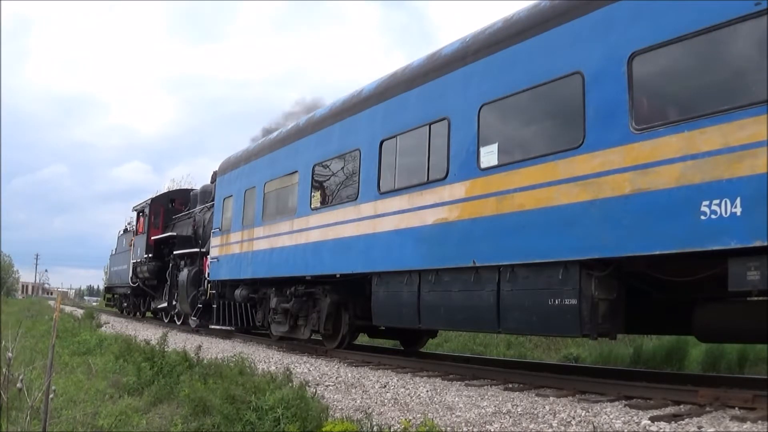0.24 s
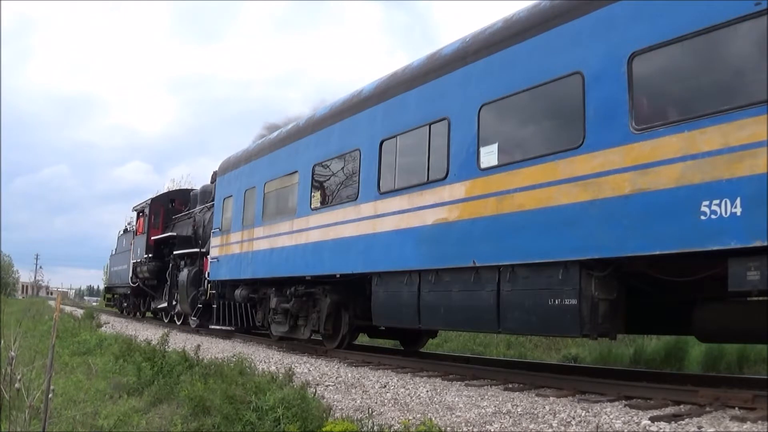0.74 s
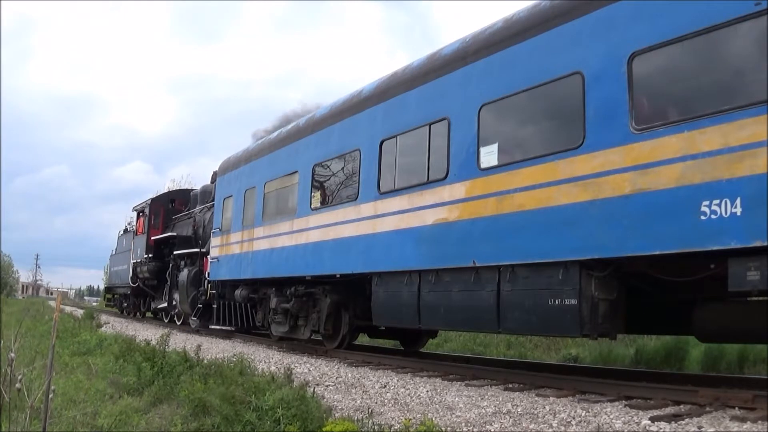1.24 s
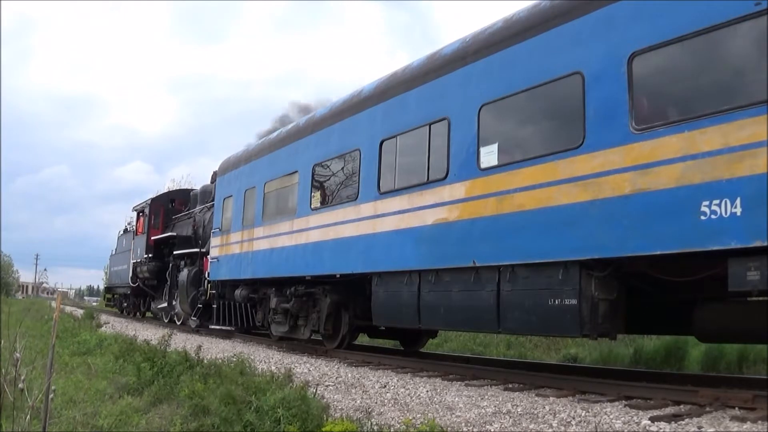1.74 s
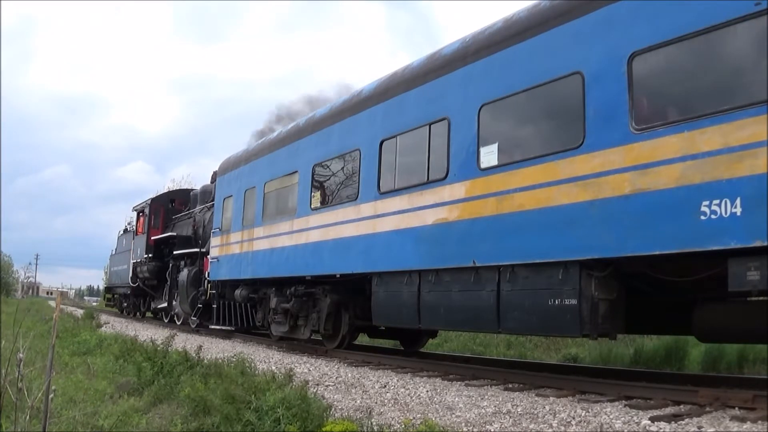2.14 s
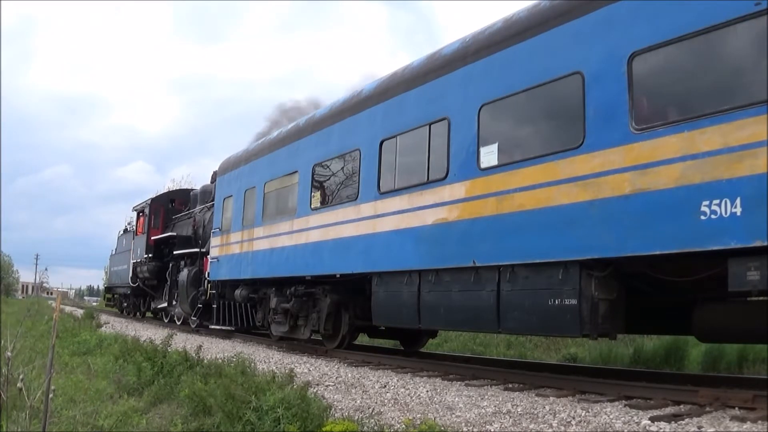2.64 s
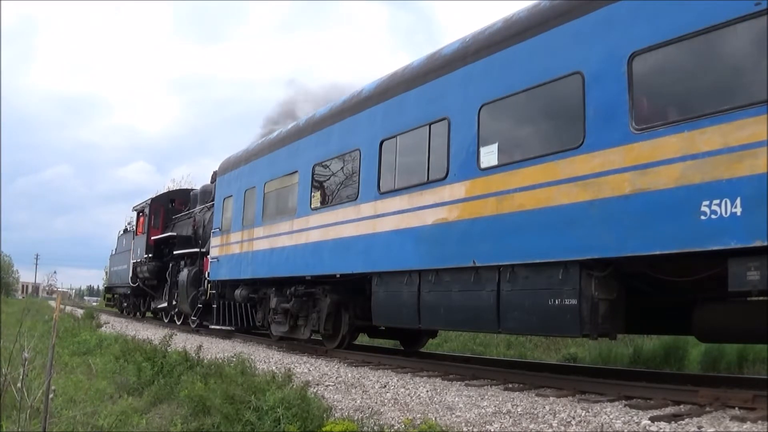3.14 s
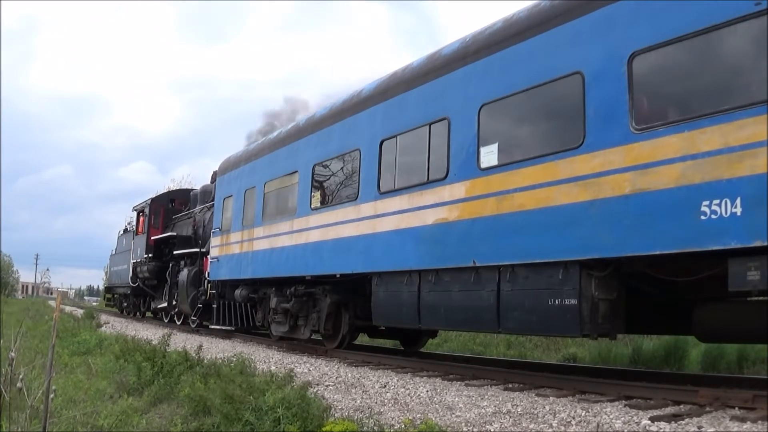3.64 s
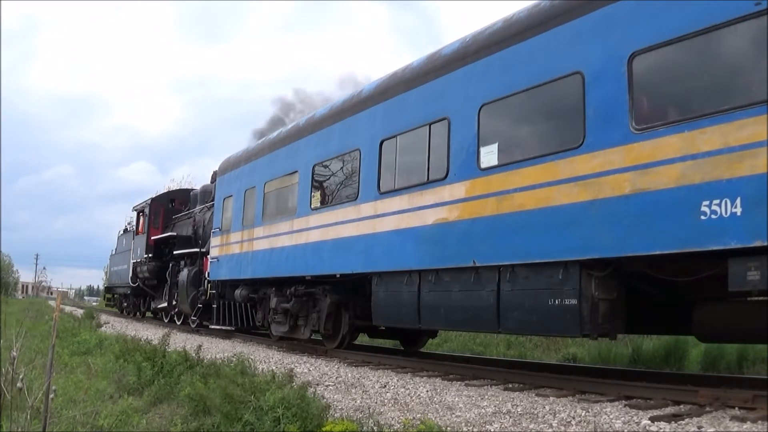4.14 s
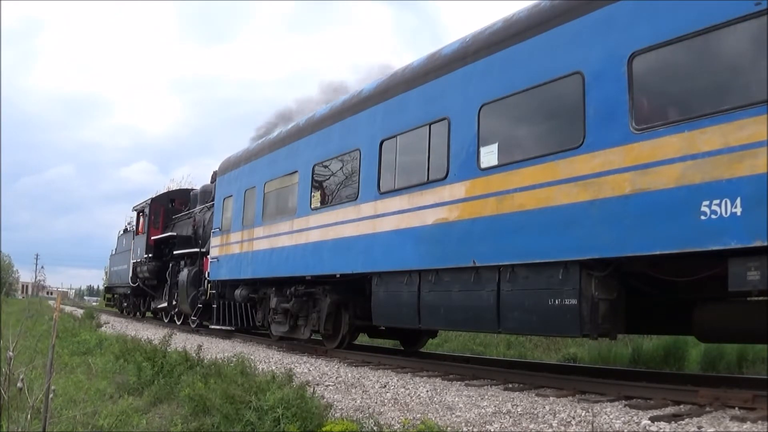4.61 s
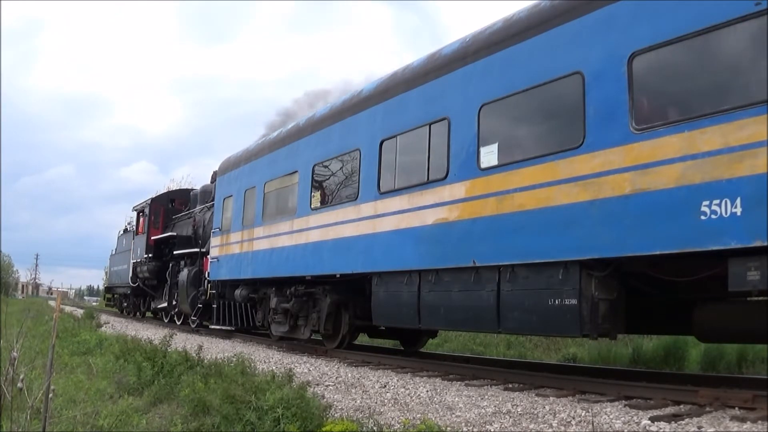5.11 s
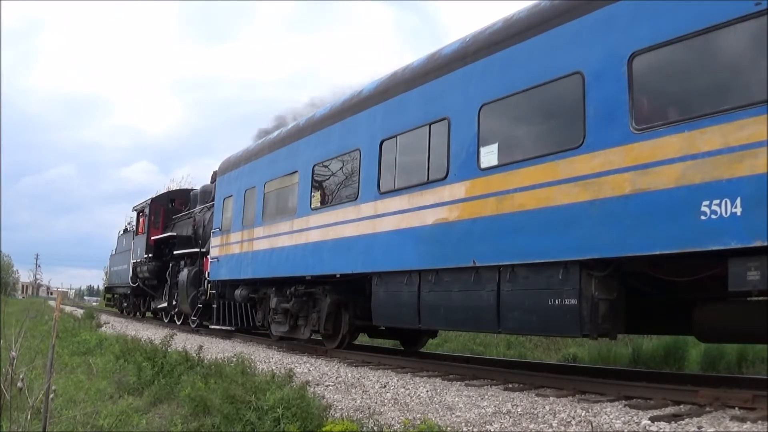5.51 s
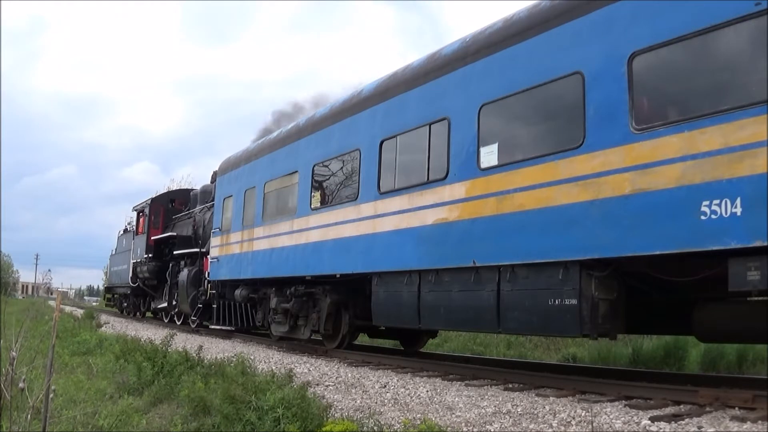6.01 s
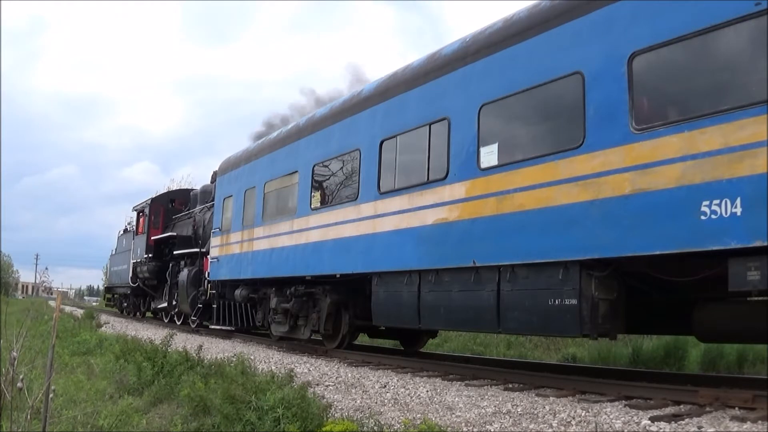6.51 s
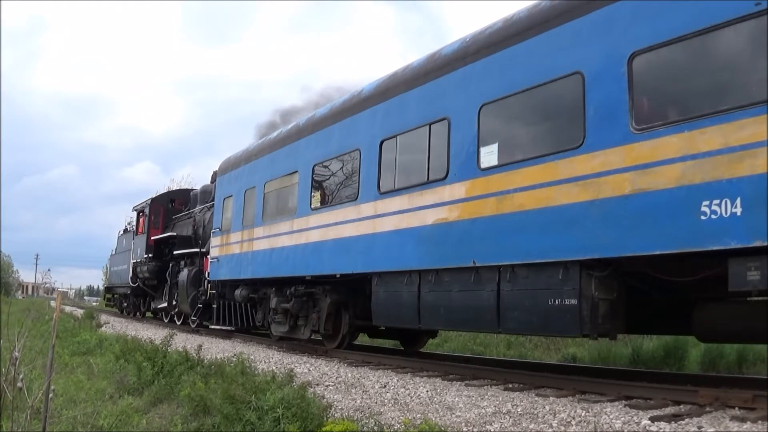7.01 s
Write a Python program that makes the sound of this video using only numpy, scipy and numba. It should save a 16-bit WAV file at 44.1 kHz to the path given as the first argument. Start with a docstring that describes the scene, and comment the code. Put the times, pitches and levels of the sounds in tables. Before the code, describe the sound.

Beside a railway carriage outdoors, a standing steam engine leaks a steady, slightly ringing hiss over a soft fluttering fire rumble. Wind thuds into the microphone. About a second in, a valve pops open with a dense roaring hiss, swelling for over two seconds, then squeals downward and snaps shut. The quiet remaining hiss gradually grows louder, with a thin, airy whistle joining later.

```python
"""Outdoors beside a railway carriage: a steam locomotive stands beyond it, and gusts buffet the microphones.
Leaking steam is coloured noise that rings in the pipework; the fire is a low, fluttering rumble.
A valve blows off for two and a half seconds, whistles as it closes and snaps shut; later a thin whistle joins.
The gain control ducks under the blast and then creeps back, so the steady hiss seems to build again."""
import sys
import numpy as np
from scipy import signal
from scipy.fft import rfft, irfft
from scipy.io import wavfile
from scipy.ndimage import uniform_filter1d
from numba import njit

SR = 44100
rng = np.random.default_rng(int(sys.argv[2]) if len(sys.argv) > 2 else 0)


def wav_out(sig):
    """Save sig, one row per channel (or a flat mono array), as 16-bit PCM at SR to the path in sys.argv[1]."""
    wavfile.write(sys.argv[1], SR, np.round(np.clip(np.atleast_2d(sig).T, -1, 1) * 32767).astype(np.int16))


N = 320166  # length [samples]

# How much steam and fire noise differs between the two ports: (frequency [Hz], side minus mid [dB])
STEAM_SIDE = [(80, -52), (500, -16), (1200, -9), (1800, -14.5), (2700, -12.5), (3900, -16.5), (5500, -13),
              (7500, -11.5), (9000, -15.5), (10500, -24), (12000, -31)]
# The valve sinks, hangs just off its seat, then snaps shut: (time [s], opening [0-1])
VALVE_CLOSING = [(3.17, 1), (3.29, .42), (3.385, 0.18), (3.42, .054), (3.545, .04), (3.585, 0)]
OPENS_S, POP_S = 1.074, 0.028  # when the valve pops open, and how long the pop takes


def undb(db):
    """Turn decibels into gain."""
    return 10 ** (np.asarray(db) / 20)


def since(s):
    """Seconds since a moment, zero before it."""
    return np.maximum(np.arange(N) / SR - s, 0)


def ramp(s, length):
    """Rise from 0 to 1, starting at a moment."""
    return np.minimum(since(s) / length, 1)


def curve(table):
    """Join (time, value) points by straight lines."""
    times, values = np.transpose(table)
    return np.interp(np.arange(N) / SR, times, values)


def bins():
    """Frequency of each spectral bin in Hz, at least 1."""
    return np.maximum(np.arange(N // 2 + 1) * SR / N, 1)


def colour(points):
    """Join (Hz, dB) points by straight lines on a log-frequency axis."""
    hz, db = np.transpose(points)
    return np.interp(np.log(bins()), np.log(hz), db)


def bell(hz, width):
    """Resonance curve: 1 at its centre, one half at half the width to either side."""
    return 1 / (1 + (2 * (bins() - hz) / width) ** 2)


def turbulence(db, side=STEAM_SIDE):
    """Two-port noise with the given dB per Hz, partly unrelated between the ports."""
    mid, apart = rfft(rng.standard_normal((2, N))) * undb(db) * np.sqrt(SR / 2)
    apart = apart * undb(colour(side))
    return irfft(np.array([mid + apart, mid - apart]), N)


def unit(x):
    """Scale so that the average of both ports has an rms of 1."""
    return x / np.std(x.mean(axis=0))


def walk(rate):
    """Random levels held for 1 / rate seconds and smoothed twice; spread near 1."""
    k = int(SR / rate)
    held = np.repeat(rng.standard_normal(N // k + 2), k)
    smooth = uniform_filter1d(uniform_filter1d(held, k), k)
    return np.sqrt(2) * smooth[k // 2:k // 2 + N]


def waver(x, depth_db, rate, count=22):
    """Moving air on the way lets neighbouring bands fade and swell by themselves."""
    band_position = np.interp(np.log(bins()), np.log([700, 13000]), [0, count - 1])
    spectrum = rfft(x)
    out = 0
    for k in range(count):
        share = np.maximum(1 - abs(band_position - k), 0)  # overlapping triangles that add up to 1
        out = out + irfft(spectrum * share, N) * undb(depth_db * walk(rate))
    return out


def opening():
    """How far the valve is open: a quick pop, a long hold, a halting close."""
    return ramp(OPENS_S, POP_S) * np.clip(curve(VALVE_CLOSING), 0, 1)


def leak():
    """A steady leak rings the pipework, drifting between favoured resonances; the open valve robs it of pressure."""
    # Broad colour of the leak, before the lifts below: (frequency [Hz], relative level per Hz [dB])
    leak_colour = [(200, -68.5), (900, -60.5), (1400, -62), (2200, -60.5), (3500, -61), (4500, -56),
                   (7000, -55.5), (9800, -54), (11000, -61.5), (12500, -66.5), (14000, -72), (16000, -85)]
    # Pipework resonances: (frequency [Hz], width [Hz], lift in the first, second and third voice [dB each])
    pipes = [(1248, 45, 9.5, 3, -1), (1436, 17, 9.5, 9.5, 4), (1655, 81, 6, 2, 0), (2033, 170, 10, 4, 3),
             (2395, 62, 11.5, 7.5, 14.5), (2510, 64, 6, 2.5, 6), (2826, 62, 13, 11, 10),
             (2983, 78, 4, 10.5, 12), (3206, 276, 7, 6.5, 5.5), (3540, 45, 3, 3, 4), (3880, 120, 13, 4, 8),
             (4310, 69, 10.5, 1, 2), (4570, 40, 6, -1, 3), (4750, 45, 13, -3, 5), (5160, 110, 7, 1, 1),
             (5920, 300, 2, 5, 1.5), (6296, 33, 6, 7, 9), (6875, 72, 9, -2, -3), (7800, 180, 7, 1.5, 2),
             (8750, 130, 6, 2, 5), (9550, 430, 3.5, 2.0, -1.5), (10270, 360, 5.5, -0.5, -3)]
    # Resonances the leak favours: (time [s], voice [0 first, 1 second, 2 third, blended in between])
    voice_path = [(1, .05), (1.6, 0.99), (6.02, 1.15), (6.85, 1.97)]
    leak_db, sag_db = 3, -5  # the sag applies in full when the valve is fully open
    voice = np.clip(curve(voice_path), 0, 2)
    lifts = sum(np.outer(lift, bell(hz, width)) for hz, width, *lift in pipes)  # one spectrum a voice
    steam = 0
    for k, lift in enumerate(lifts):
        blend = np.sqrt(np.maximum(1 - abs(voice - k), 0))  # crossfade at equal power
        steam = steam + turbulence(colour(leak_colour) + lift) * blend
    sputter = undb(0.42 * walk(20) + 0.37 * walk(250))  # wet steam leaves unevenly
    return waver(steam, depth_db=1.31, rate=8) * sputter * undb(leak_db + sag_db * opening())


def fire():
    """Fire and draught make a low rumble whose level flutters with the flames."""
    # Colour of fire and draught: (frequency [Hz], relative level per Hz [dB])
    fire_colour = [(25, -47.5), (55, -54), (86, -43), (105, -48.5), (135, -45.5), (190, -55.5), (300, -54),
                   (415, -50), (520, -55.5), (650, -64.5), (820, -59.5), (1200, -76), (3000, -95)]
    return turbulence(colour(fire_colour)) * undb(-0.4 + 1.0 * walk(14))


def wind():
    """Gusts hit fast, hold and die away over a light breeze; all of it breaks into quick eddies at the ports."""
    # Gusts: (start time [s], relative level [dB], time from start to release [s])
    gusts = [(0.039, -12, 0.29), (.118, -8.5, .06), (.417, -9.5, 0.014), (0.549, -1.5, 0.036),
             (.6, -5.5, 0.081), (.71, -9, .355), (0.952, 12, .0065), (1.308, -6, .06), (1.483, 1.5, .028),
             (1.606, -6, .025), (1.686, 1.5, 0.019), (1.83, -10, .07), (2.048, -7.5, 0.022),
             (2.233, -9, 0.031), (2.322, -11, .025), (2.655, -14, .05), (3.078, -14, .035),
             (4.276, -12.5, .05), (4.352, -15.5, .1), (5.314, -14, .035), (6.08, -9, .045),
             (6.142, -14, .07)]
    # Colour of the wind noise: (frequency [Hz], relative level [dB])
    wind_colour = [(20, -7), (65, 0.5), (150, 2), (250, -4), (400, -10.5), (600, -19), (1000, -29),
                   (3000, -70)]
    # How much the wind differs between the ports: (frequency [Hz], side minus mid [dB])
    wind_side = [(30, -7), (100, -7.5), (200, -2), (350, .5), (1000, 3.5)]
    attack_s, longest_release_s = 0.007, 0.021
    # The fitful breeze sinks steadily to near calm
    breeze_db, calm_db, fitful_db = -21, -37, 3
    sinks_from_s, sink_db_per_s = 1.7, 9
    level_db = np.maximum(breeze_db - sink_db_per_s * since(sinks_from_s), calm_db)
    power = undb(level_db + fitful_db * walk(12)) ** 2
    for s, db, hold in gusts:
        release = min(hold, longest_release_s)  # a brief slap dies away sooner
        gust = undb(db) * ramp(s, attack_s) * np.exp(-since(s + hold) / release)
        power = power + gust ** 2
    eddies = undb(2.5 * walk(110) - 1.8)
    push = 0.31 * power  # dynamic pressure grows with the square of the speed and chokes the limiter
    return unit(turbulence(colour(wind_colour), wind_side)) * eddies * np.sqrt(power) + push


def blow_off():
    """The open valve hisses and its plume roars; an echo off the ground hollows out evenly spaced bands."""
    # Colour of the hiss: (frequency [Hz], relative level [dB])
    hiss_colour = [(800, -41), (2000, -23), (3000, -13.5), (4300, -2.5), (5500, -1.5), (7000, -1),
                   (8500, 1), (9900, 0.5), (11000, -9.5), (12500, -14), (14000, -21), (16000, -79)]
    # Colour of the roar: (frequency [Hz], relative level [dB])
    roar_colour = [(200, -14), (500, -16.5), (850, -6), (1300, -7), (1700, 1), (2500, 2.5), (3500, 3),
                   (6000, -25.5)]
    # Resonances of the valve outlet: (frequency [Hz], width [Hz], lift [dB])
    outlet_modes = [(1650, 399, 2), (1883, 78, 3.5), (2360, 71, 6.5), (2610, 140, 4.5), (3363, 550, 3.5),
                    (3680, 106, 4), (3995, 70, 7), (4380, 178, 5.5), (4692, 80, 5.5), (5300, 110, 4.5),
                    (5850, 510, 3), (6510, 180, 4), (7500, 180, 4), (8600, 63, 1.5)]
    # Surges of the plume: (time [s], lift [dB])
    surges = [(1.29, 4), (2.35, 3.5), (2.82, 3.5)]
    surge_s, plume_s = 0.11, 0.24  # spread of one surge; time the plume takes to build
    hiss_db, roar_db, swell_db_per_s = 9.3, -3.5, 2.1  # starting levels; both then keep swelling
    echo_s, echo_gain = 0.001087, 0.31  # the gain is that of the lowest notes

    flow = opening()
    grown = ramp(OPENS_S, plume_s)
    surge_db = sum(db * np.exp(-((since(0) - s) / surge_s) ** 2) for s, db in surges)
    plume = grown * flow ** 0.6 * undb(surge_db + 0.7 * walk(6.88))
    outlet = sum(lift * bell(hz, width) for hz, width, lift in outlet_modes)

    hiss = unit(turbulence(colour(hiss_colour) + outlet)) * undb(hiss_db) * flow
    # The young jet is thin: a band around 2750 Hz fills in with the plume
    missing_band = irfft(rfft(hiss) * bell(2750, 1600), N)
    hiss = hiss - (1 - grown) * missing_band
    roar = unit(turbulence(colour(roar_colour) + outlet)) * undb(roar_db) * plume
    swell = undb(swell_db_per_s * since(OPENS_S))

    delay = np.exp(-2j * np.pi * bins() * echo_s)
    ground = 1 + echo_gain * delay * bell(0, 3100)  # ballast scatters the treble
    jet = irfft(rfft((hiss + roar) * swell) * ground, N)
    flicker = undb(0.79 * walk(39.65) + 0.5 * walk(300))
    return waver(jet, depth_db=1.47, rate=14) * flicker


def valve_seat():
    """Steam squeezed through the closing gap rings high, then lower, until the valve shuts."""
    # Upper rings of the seat: (frequency [Hz], width before broadening [Hz], relative level [dB])
    upper_modes = [(4730, 350, -6), (5370, 340, 0), (5900, 460, 2), (6700, 450, -5.5), (7620, 280, -3.5)]
    # Lower rings of the seat: (frequency [Hz], width before broadening [Hz], relative level [dB])
    lower_modes = [(1080, 170, -9), (1850, 170, -11), (2970, 240, 3), (3620, 440, -9.5)]
    gap = np.clip(curve(VALVE_CLOSING), 0, 1)

    def ring(modes, db, flow_power, squeeze_power):
        """Noise shaped by resonances: it needs both some flow and a narrowed gap."""
        power = sum(undb(level) ** 2 * bell(hz, 1.3 * width) ** 2 for hz, width, level in modes)
        noise = unit(turbulence(10 * np.log10(power)))
        return noise * undb(db) * gap ** flow_power * (1 - gap) ** squeeze_power

    upper = ring(upper_modes, db=23.3, flow_power=0.85, squeeze_power=1.2)
    lower = ring(lower_modes, db=6, flow_power=0.35, squeeze_power=4)
    return (upper + lower) * undb(0.34 * walk(60))


def whistle():
    """The leak catches one pipe resonance and whistles thinly on it: a very narrow band of noise."""
    pitch_hz, width_hz, level_db = 2988, 34, -30.5
    starts_s, attack_s = 4.75, 0.3
    # Cubing the bell's power steepens its sides, so it starts twice as wide
    tone = unit(turbulence(30 * np.log10(bell(pitch_hz, 2 * width_hz))))
    return tone * undb(level_db) * ramp(starts_s, attack_s)


def place(x, left_db):
    """Tip a sound to the left, band by band, sharing the difference between both ports."""
    return irfft(rfft(x) * undb(np.outer([0.5, -0.5], colour(left_db))), N)


def scene():
    """The engine's steam comes from a little to the left; the wind is at the microphones."""
    # How much louder the engine is on the left: (frequency [Hz], left minus right [dB])
    engine_left = [(300, .3), (1200, 2.2), (2600, 1.7), (3800, .3), (6400, 3.4), (7600, 2.8), (8800, .9),
                   (10200, 0)]
    steam = leak() + blow_off() + valve_seat() + whistle()
    return place(steam, engine_left) + fire() + wind()


@njit
def follow(excess, attack_s, release_db_per_s, start_db):
    """Gain reduction in dB: rises towards the excess, falls back at a fixed slope."""
    out, held = np.empty(len(excess)), start_db
    for i in range(len(excess)):
        if excess[i] > held:
            held += (excess[i] - held) / (attack_s * SR)
        else:
            held = max(held - release_db_per_s / SR, 0.)
        out[i] = held
    return out


def record(dry):
    """A quick limiter catches the peaks, a slow gain control holds the level down; rumble and top are cut."""
    power = uniform_filter1d(np.mean(dry ** 2, axis=0), size=300)
    heard_db = 10 * np.log10(np.maximum(power, 1e-12))
    slow = follow(0.92 * (heard_db + 14.0), attack_s=0.073, release_db_per_s=4.85, start_db=3.5)
    quick = follow(heard_db + 11.7, attack_s=0.002, release_db_per_s=420., start_db=0.)
    out = np.clip(dry * undb(-np.maximum(slow, quick)), -0.9, 0.9)  # the stronger reduction wins
    rumble_cut = signal.butter(3, 28, "high", fs=SR, output="sos")
    top_cut = signal.ellip(10, 0.2, 80, 15400, fs=SR, output="sos")
    return signal.sosfilt(top_cut, signal.sosfilt(rumble_cut, out))


dry = scene()
out = record(dry)
wav_out(out)
```